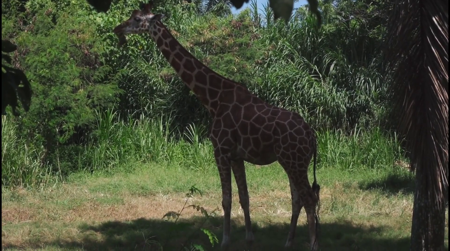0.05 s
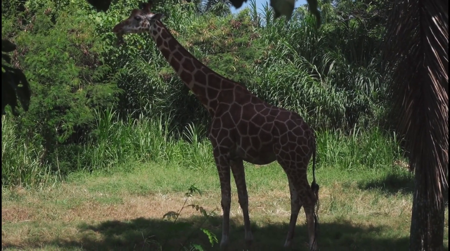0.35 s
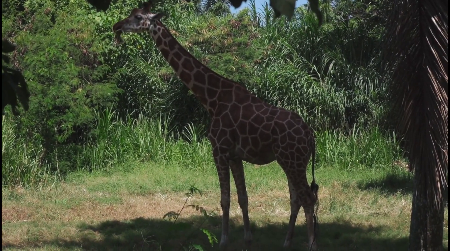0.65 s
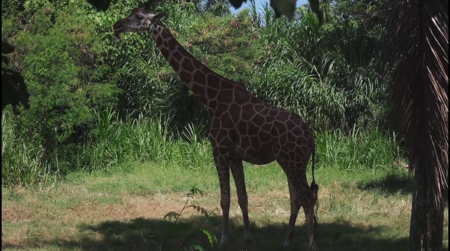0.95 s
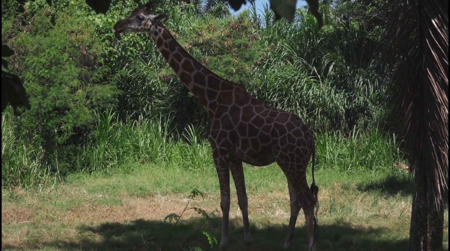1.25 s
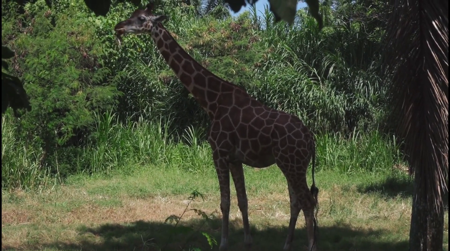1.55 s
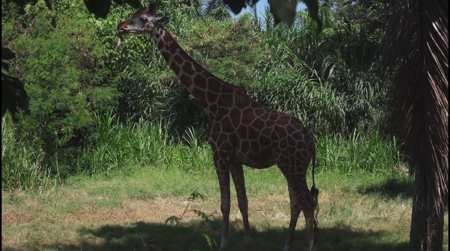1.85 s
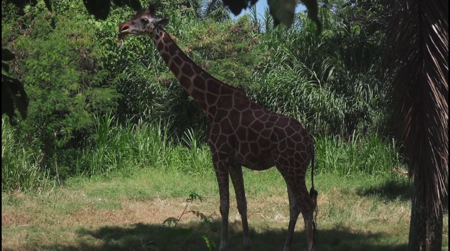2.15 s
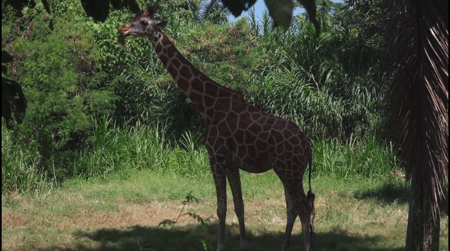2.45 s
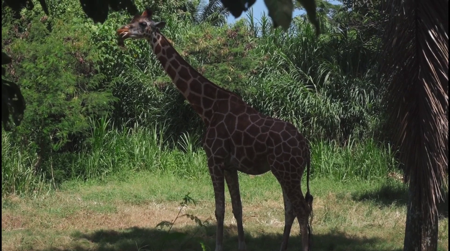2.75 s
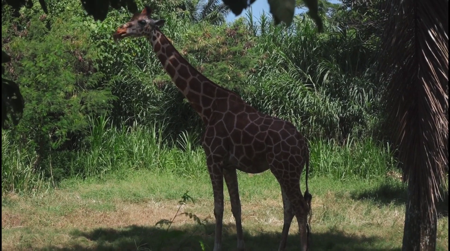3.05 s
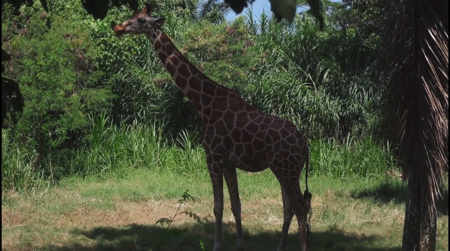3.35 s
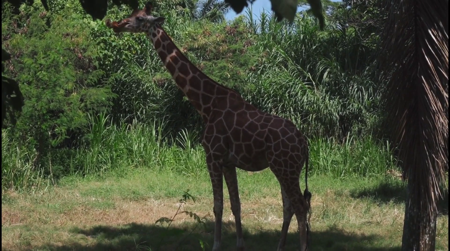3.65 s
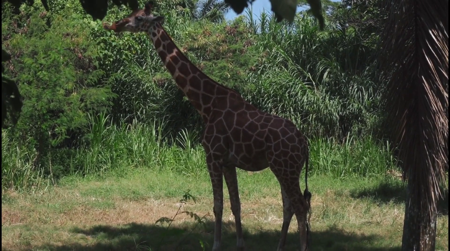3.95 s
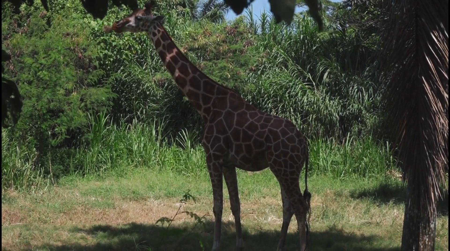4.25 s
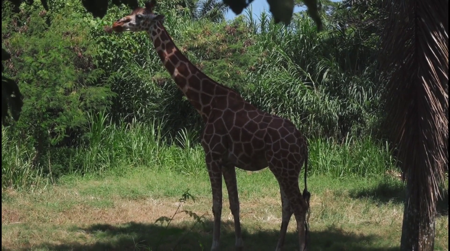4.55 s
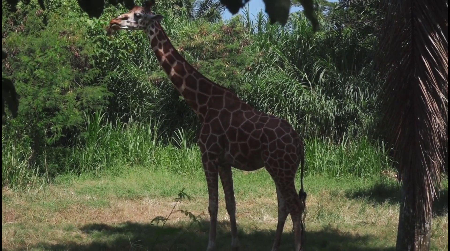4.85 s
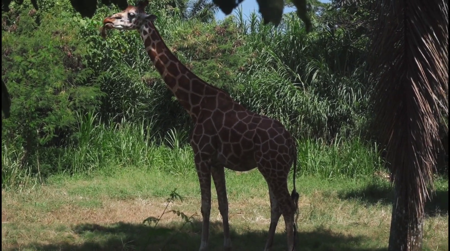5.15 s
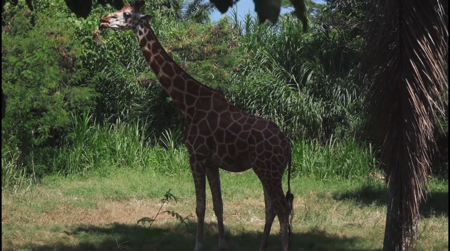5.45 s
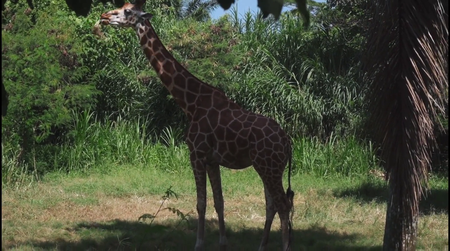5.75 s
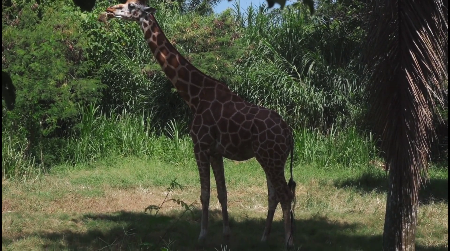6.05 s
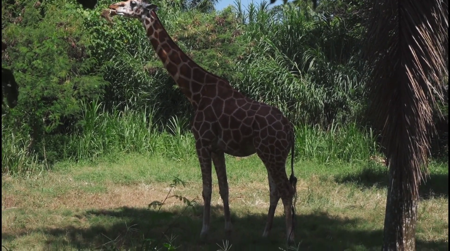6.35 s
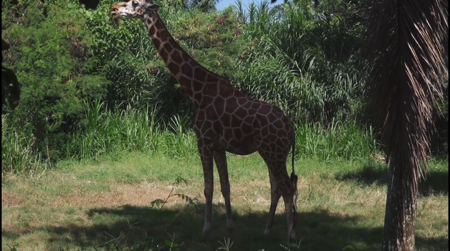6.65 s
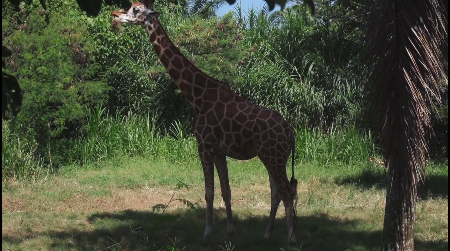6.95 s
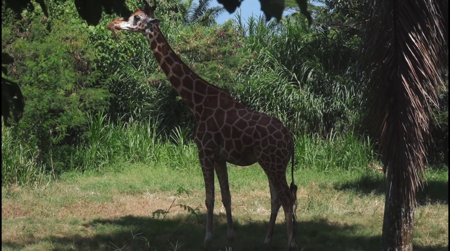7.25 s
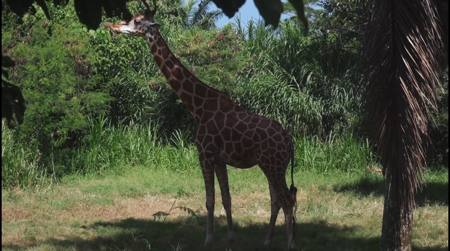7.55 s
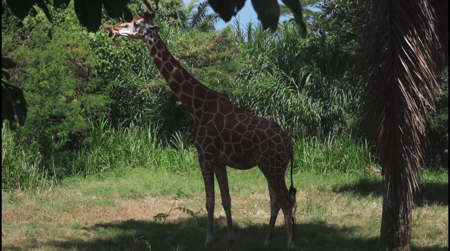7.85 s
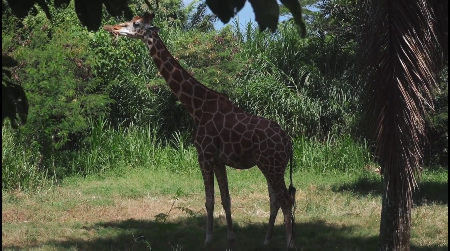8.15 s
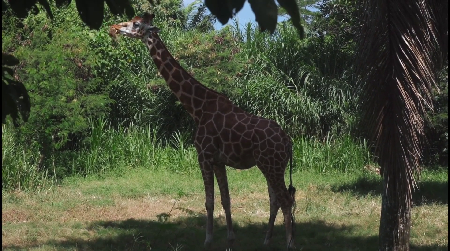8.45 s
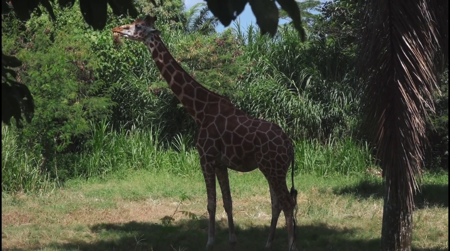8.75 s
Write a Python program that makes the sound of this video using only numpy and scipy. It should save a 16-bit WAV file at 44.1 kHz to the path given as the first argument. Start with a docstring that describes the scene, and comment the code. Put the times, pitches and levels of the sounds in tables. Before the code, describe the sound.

A giraffe feeds on a tree outdoors, tugging at a branch so that the leaves rustle, crinkle and rip in short, irregular bursts. Twigs tick and snap, loudest in one early cluster and again after the middle. Its mouth adds dull pops and soft lip scuffs. The feeding sounds fairly close, over a thin hiss, a faint hum and a low rumble that swells briefly near the end.

```python
"""Leaves rustle and rip as a large animal feeds in a tree, pulling at a branch and stripping it.
With each pull the leaves rub and crinkle and the bending branch ticks. Stalks and twigs snap,
and once the branch springs back with a hollow knock. The mouth adds dull pops and scuffs.
Under it all lie a low outdoor rumble, a faint hum and a thin hiss."""
import sys
import numpy as np
from scipy import signal
from scipy.io import wavfile

SR = 44100
rng = np.random.default_rng(int(sys.argv[2]) if len(sys.argv) > 2 else 0)


def pcm_store(signal):
    """Save signal as 16-bit PCM."""
    levels = np.round(np.clip(np.atleast_2d(signal), -1, 1) * 32767)
    wavfile.write(sys.argv[1], SR, levels.astype(np.int16).T)


N = 392049
TIME = np.arange(N) / SR


def gain_of(db):
    """Turns decibels into a number to multiply a sound by."""
    return 10 ** (np.asarray(db) / 20)


def evened(x):
    """Scales a sound to an average strength (rms) of 1."""
    return x / np.sqrt(np.mean(x ** 2) + 1e-20)


def level_at(tone, hz):
    """Looks up the level in dB that a tone table gives at hz."""
    f, db = np.transpose(tone)
    return np.interp(np.log(hz + 1), np.log(f + 1), db)


def add(mix, start_s, sound):
    """Lays a sound into the mix at start_s."""
    part = mix[max(round(start_s * SR), 0):][:len(sound)]
    part += sound[:len(part)]


def colour(x, shape_db, size=2048):
    """Turns each frequency up or down by shape_db(hz), keeping sudden starts sharp."""
    log_gain = np.log(gain_of(shape_db(abs(np.fft.fftfreq(size, 1 / SR)))))
    response = np.exp(np.conj(signal.hilbert(log_gain)))  # rings after a hit, never before
    return signal.fftconvolve(x, np.fft.ifft(response).real)[:len(x)]


def bump(hz, centre_hz, octaves):
    """A hump of height 1 around the pitch at which something rings."""
    return 1 / (1 + (np.log2((hz + 1) / centre_hz) / octaves) ** 2)


def split(x, hz=5210, order=4):
    """The parts of a sound below and above hz: its body and its treble."""
    filters = [signal.butter(order, hz, side, fs=SR, output="sos") for side in ("low", "high")]
    return [signal.sosfilt(sos, x) for sos in filters]


def wander(rate_hz):
    """A smooth random drift, changing up to about rate_hz times a second."""
    smoothing = signal.butter(2, rate_hz, fs=SR, output="sos")
    return evened(signal.sosfilt(smoothing, rng.standard_normal(N)))


def crinkle(per_s, spread_db, size=N):
    """Tiny clicks at random moments: many small, a few large."""
    strength = gain_of(spread_db * np.minimum(rng.exponential(1, size), 3.5))
    return evened(strength * rng.choice([-1, 1], size) * (rng.random(size) < per_s / SR))


# Tone of the outdoor air: f/Hz, relative level/dB
AIR_TONE = [(20, -18), (45, -4.5), (80, -6), (122, -7), (150, -15), (240, -18), (330, -22.5), (450, -26),
            (1000, -32), (3300, -34), (7000, -33.5), (11400, -35), (15200, -42.5), (16200, -67)]
# How far the low rumble is turned up or down: t/s, level/dB
RUMBLE_SWELL = [(0, -1), (8.31, -9), (8.37, 21), (8.46, 15), (8.58, 7)]


def outdoors(air_db=-60.5, rumble_hz=130, hum_hz=119, hum_db=-68):
    """A thin hiss, a faint wavering hum and a distant rumble that swells near the end."""
    air = evened(colour(rng.standard_normal(N), lambda hz: level_at(AIR_TONE, hz), size=4096))
    rumble, _ = split(air, rumble_hz)
    swell_db = np.interp(TIME, *np.transpose(RUMBLE_SWELL))
    air += rumble * (gain_of(swell_db) - 1)
    hum = np.sqrt(2) * np.sin(2 * np.pi * hum_hz * TIME + 0.55 * wander(rate_hz=2))
    return gain_of(air_db) * air + gain_of(hum_db) * hum


# Lips scuffing along the branch: t/s, length/s, relative level/dB, f/Hz, ring boost/dB
LIP_SCUFFS = [(0.295, 0.055, -66, 850, 6), (1.396, 0.024, -52.5, 810, -7), (1.454, 0.088, -63, 613, 19),
              (2.024, 0.033, -54, 554, 9), (2.296, 0.072, -57, 650, 2), (3.452, 0.022, -59, 820, 5),
              (5.123, 0.025, -56, 1044, 7), (5.424, 0.031, -61.5, 700, -1), (5.942, 0.065, -57.5, 800, 3),
              (6.168, 0.03, -51.5, 680, 2), (6.188, 0.042, -64, 700, 17), (6.319, 0.086, -59.5, 674, -2),
              (6.564, 0.025, -43, 606, -12.5), (6.866, 0.063, -59, 594, 13), (6.909, 0.0083, -47, 1170, 10),
              (7.88, 0.025, -49, 1253, 20)]


def lip_scuffs(level_db=4.5, fall_db_per_octave=11, size=8192):
    """Quick slips of the lips ring in the hollow of the mouth, which muffles all above its pitch."""
    out, t = np.zeros(N), TIME[:size]
    for start_s, length_s, db, mouth_hz, ring_db in LIP_SCUFFS:
        def hollow(hz):
            octaves_above = np.log2(np.maximum(hz / mouth_hz, 1))
            return ring_db * bump(hz, mouth_hz, octaves=0.13) - fall_db_per_octave * octaves_above
        slips = colour(crinkle(per_s=1500, spread_db=3, size=size), hollow)
        stroke = np.interp(t / length_s, [0, .15, .7, 1.3], [0, 1, .8, 0])  # rise, hold, fade
        add(out, start_s, gain_of(db + level_db) * evened(slips) * stroke)
    return out


# Dull pops of the mouth on the shoots: t/s, relative level/dB, length of the push/s
MOUTH_POPS = [(0.2667, -44.5, 0.00045), (0.3488, -36.5, 0.00047), (0.4401, -43, 0.00024),
              (0.751, -41, 0.0004), (1.0024, -34, 0.00037), (2.0275, -44.5, 0.00037),
              (2.3956, -28, 0.00008), (2.9851, -39, 0.00018), (3.3616, -48.5, 0.00048),
              (3.7513, -42.5, 0.00019), (3.7855, -43, 0.00052), (4.283, -40.5, 0.0004),
              (4.4072, -42.5, 0.00018), (4.4356, -42.5, 0.00018), (4.5044, -38.5, 0.00035),
              (5.088, -35.5, 0.00039), (5.3087, -39.5, 0.00031), (5.4618, -33, 0.00036),
              (5.6202, -42.5, 0.00067), (5.6489, -43, 0.00027), (5.6747, -36.5, 0.00021),
              (5.876, -43, 0.00041), (6.012, -38, 0.00036), (6.599, -37.5, 0.00042),
              (7.633, -36.5, 0.00014), (8.6754, -42, 0.00044)]
# Tone of the mouth: f/Hz, relative level/dB
MOUTH_TONE = [(60, 1), (200, 2), (700, 2), (1500, 4), (2200, 5.5), (5000, 0.5), (12000, -48)]


def mouth_pops(level_db=7, rebound_s=0.0052, size=1024):
    """Each pop is one brief push of air, followed by a small ragged rebound."""
    out, t = np.zeros(N), TIME[:size]
    for start_s, db, length_s in MOUTH_POPS:
        push = np.clip((length_s - t) * SR, 0, 1)
        rebound = 0.33 * rng.standard_normal(size) * np.exp(-t / rebound_s)
        add(out, start_s, gain_of(db + level_db) * (push + rebound))
    return colour(out, lambda hz: level_at(MOUTH_TONE, hz))


# Notes the branch rings with: f/Hz, peak level/dB, time to fade by 60 dB/s
BRANCH_NOTES = [(595, -31, 0.011), (746, -26, 0.026)]


def branch_knock(start_s=5.6488):
    """As its thickest shoot breaks, the branch springs back with a short, hollow, woody note."""
    out, t = np.zeros(N), TIME[:SR // 10]
    for hz, db, fade_s in BRANCH_NOTES:
        add(out, start_s, gain_of(db - 60 * t / fade_s) * np.sin(2 * np.pi * hz * t))
    return out


# Tone of cracking wood, for both ticks and snaps: f/Hz, relative level/dB
TWIG_TONE = [(100, -26), (600, -6), (1200, -8), (1900, 2.5), (2500, -3), (3200, -0.5), (5500, -7),
             (7500, -6), (10000, -12.5), (12500, -21), (15200, -27.5), (16200, -48)]


def branch_ticks(pull_db, bright_db, level_db=-6.5, ring_db=17):
    """Small dry ticks run through the bending branch; they are turned down in brighter pulls."""
    out = np.zeros(N)
    for tick_hz in np.geomspace(2100, 8500, num=8):
        wood = lambda hz: 0.6 * level_at(TWIG_TONE, hz) + ring_db * bump(hz, tick_hz, octaves=0.64)
        out += colour(crinkle(per_s=4, spread_db=1.5), wood)
    return evened(out) * gain_of(level_db + pull_db - 0.9 * np.maximum(bright_db, 0))


# Stalks and twigs breaking: t/s, level/dB, ringing f/Hz, treble compared with body/dB
TWIG_SNAPS = [(0.027, -38, 2500, -27), (0.1501, -39, 4360, -10.5), (0.1716, -44.5, 4350, -9),
              (0.203, -41.5, 2970, -13), (0.2664, -41, 1900, -1), (0.367, -37.5, 4360, 8),
              (0.4402, -40, 3840, 6), (0.7017, -45, 5040, 1), (0.7494, -39.5, 1820, -23),
              (0.8494, -45.5, 2110, -4), (0.897, -42.5, 3790, -14), (0.919, -49, 5470, 7),
              (1.0644, -43.5, 5000, 3), (1.0933, -40.5, 3740, -13), (1.2017, -37, 5570, -6),
              (1.233, -34, 5070, -18), (1.2412, -37.5, 5000, -10), (1.4041, -36, 2740, -12),
              (1.4186, -32.5, 2880, -1), (1.459, -24, 3300, -9), (1.4625, -30, 4200, 0),
              (1.4648, -21, 4860, -10), (1.4725, -22.5, 4150, -8), (1.4895, -33, 3530, 5),
              (1.4939, -12, 3300, -6.5), (1.4976, -27, 3640, 9), (1.5053, -21, 3290, -3),
              (1.5097, -23, 3670, -2), (1.5177, -24, 4400, -20.5), (1.5385, -31, 3320, 7),
              (1.5501, -34, 4730, 5), (1.5547, -31, 6290, 10), (1.558, -23, 2620, -5.5),
              (1.5746, -45, 2080, 1), (1.727, -28, 3320, -5.5), (1.7317, -35, 6660, -6),
              (1.7878, -41.5, 4670, -24), (1.9874, -37, 3460, -6), (2.0393, -18.5, 6230, 6.5),
              (2.1094, -36.5, 3860, 6), (2.322, -32, 5800, -5), (2.3955, -33.5, 3980, 4),
              (2.4064, -35, 3140, 3), (2.413, -34, 6070, 3), (2.418, -41, 3140, -2),
              (2.4253, -29.5, 3150, 1), (2.4491, -34, 3400, -8), (2.4676, -36, 3500, -22),
              (2.7422, -36.5, 6840, -1.5), (2.7829, -34, 4000, -1), (2.7916, -32, 4350, -14),
              (2.859, -43.5, 1870, 1), (2.9838, -39.5, 4570, 2), (3.0689, -38, 1980, -13),
              (3.2315, -41.5, 2200, -4), (3.287, -37, 2300, -10), (3.36, -40.5, 4200, -7),
              (3.462, -41.5, 2030, -11), (3.492, -41.5, 4130, -5), (3.5446, -35, 3550, 15),
              (3.5738, -27, 2050, -5), (3.653, -35, 6890, 15), (3.7218, -34.5, 8300, -1),
              (3.777, -30.5, 6600, -5), (4.07, -46.5, 4610, 6), (4.3, -37, 4450, -3),
              (4.342, -41.5, 2200, -20), (4.395, -45, 4300, -4), (4.461, -30, 4240, -2),
              (4.5615, -33, 3900, 0), (5.104, -43.5, 1930, -18), (5.183, -33.5, 5200, -13),
              (5.195, -35.5, 4940, 4), (5.3095, -38, 4730, 4), (5.4037, -30.5, 4560, -2),
              (5.4485, -37, 8900, 11), (5.5032, -30, 3900, 4), (5.517, -28.5, 6050, 17),
              (5.597, -32, 4540, 2), (5.6321, -23.5, 6600, -1), (5.649, -20, 3800, 2),
              (5.654, -26, 3440, 11), (5.733, -19.5, 2360, -7), (5.7564, -33.5, 3920, -9),
              (5.7857, -25.5, 4300, 2), (5.8086, -32, 3900, -8), (5.9204, -33, 3400, -7),
              (5.9348, -37, 6600, 2), (6.026, -40.5, 3490, 6), (6.2742, -39, 5430, 24),
              (6.479, -36.5, 5000, 16), (6.538, -16, 9900, 13.5), (6.6077, -23.5, 9100, 17),
              (6.6235, -37.5, 2680, -25), (6.696, -44, 2000, -8), (6.715, -18.5, 2900, 2.5),
              (6.86, -35, 2150, -1), (6.882, -36, 7130, 12), (6.9628, -38.5, 6010, 5.5),
              (7.609, -45.5, 6030, -1), (7.635, -35, 6100, -6.5), (7.714, -38, 5700, 0),
              (7.7887, -36, 2010, -15), (7.863, -33.5, 3500, -3), (7.881, -25, 3100, -10),
              (7.8855, -24, 3280, 17), (7.8968, -25, 3180, -3), (8.4395, -47.5, 4530, -9),
              (8.645, -37, 6060, 1), (8.7648, -42.5, 4450, -5), (8.808, -41.5, 5200, 4)]


def twig_snaps(strain_s=0.0007, fibres_s=0.0007, shiver_s=0.005, size=2048):
    """A stalk strains and gives way in one crack, its last fibres follow, and nearby leaves shiver."""
    out = np.zeros(N)
    lead = round(0.004 * SR)  # samples before the crack
    t = (np.arange(size) - lead) / SR
    strain = 0.03 * np.exp(-abs(t) / strain_s)
    fibres = 0.24 * np.exp(-abs(t) / fibres_s)
    shiver = 0.03 * np.exp(-abs(t) / shiver_s)
    splinters = np.where(t < 0, strain, fibres + shiver)
    for start_s, db, ring_hz, treble_db in TWIG_SNAPS:
        crack = rng.standard_normal(size) * splinters
        crack[lead] = 1  # the break itself
        ring_db = 14 + 0.16 * db  # the harder the break, the more the stub rings

        def stalk(hz):
            # a thin stalk gives off little sound below its own pitch
            loss_db = 4 * np.clip(np.log2(ring_hz / (hz + 1)), 0, 2)
            return level_at(TWIG_TONE, hz) + ring_db * bump(hz, ring_hz, octaves=0.3) - loss_db
        body, treble = split(colour(crack, stalk))
        snap = evened(body) + gain_of(treble_db) * evened(treble)
        snap /= np.std(snap[lead:2 * lead])  # the 4 ms after the break set the level
        add(out, start_s - lead / SR, gain_of(db) * snap)
    return out


# Pulls at the leaves, each with its own loudness and brightness; firm ones tend to be brighter:
# t/s, length/s, relative level/dB, brightness/dB
LEAF_PULLS = [(0.0, 0.022, -46, 0.5), (0.116, 0.11, -59.5, 0), (0.311, 0.025, -42, 3),
              (0.514, 0.053, -51, 1), (0.602, 0.024, -51.5, 0), (0.694, 0.067, -51, 1.5),
              (0.832, 0.091, -48.5, 0.5), (0.949, 0.056, -50, 3.5), (1.058, 0.023, -50.5, 0.5),
              (1.19, 0.069, -51.5, 2), (1.324, 0.11, -54, 0), (1.445, 0.024, -31, 1.5),
              (1.503, 0.024, -37, 3.5), (1.64, 0.11, -56.5, -3.5), (1.979, 0.13, -46.5, 1.5),
              (2.238, 0.01, -51, 3.5), (2.314, 0.017, -41, 1), (2.432, 0.047, -51.5, -1.5),
              (2.606, 0.12, -55, -0.5), (2.787, 0.094, -53.5, 1), (3, 0.15, -58.5, 1.5),
              (3.074, 0.008, -49.5, -3.5), (3.145, 0.24, -52, 2), (3.461, 0.011, -48, 1),
              (3.551, 0.027, -37.5, 1), (3.637, 0.18, -47.5, 3), (3.823, 0.064, -56.5, 0.5),
              (4.013, 0.2, -54.5, -0.5), (4.257, 0.32, -49, 1.9), (4.684, 0.07, -57, 0),
              (4.958, 0.057, -62.5, 1), (5.102, 0.08, -44.5, 2), (5.275, 0.32, -48, 3.5),
              (5.602, 0.07, -41, 2), (5.726, 0.062, -42.5, 1), (5.857, 0.024, -51, 2.5),
              (5.967, 0.028, -44.5, 3), (6.12, 0.31, -51, 3.5), (6.338, 0.043, -52, 1),
              (6.457, 0.25, -48.5, 0), (6.52, 0.016, -40, 4.5), (6.577, 0.063, -49.5, 6),
              (6.886, 0.005, -41, 0), (7.065, 0.14, -57.5, 0.5), (7.637, 0.009, -53, 2.5),
              (7.714, 0.073, -47, 2), (7.86, 0.041, -44, 4), (7.965, 0.032, -57, 3.5),
              (8.08, 0.12, -61.5, -0.5), (8.303, 0.11, -65, 0), (8.485, 0.033, -51, -0.5),
              (8.58, 0.17, -50.5, 4)]


def pulling(build_db_per_s=392, release_db_per_s=259, tremble_db=-15, settle_db_per_s=43.5):
    """Level and brightness of the leaves in dB: each pull builds, holds, lets go and trembles out."""
    t = TIME[::64]
    start_s, length_s, db, bright_db = np.transpose(LEAF_PULLS)[:, :, None]
    before_s = np.maximum(start_s - t, 0)
    after_s = np.maximum(t - start_s - length_s, 0)
    build = gain_of(db - build_db_per_s * before_s)
    release = gain_of(-release_db_per_s * after_s)
    tremble = gain_of(tremble_db - settle_db_per_s * after_s)
    power = build ** 2 * (release ** 2 + tremble ** 2)  # one row for each pull
    total = power.sum(0) + 1e-20
    brightness = (power * bright_db).sum(0) / total  # louder pulls count for more
    return np.interp(TIME, t, 10 * np.log10(total)), np.interp(TIME, t, brightness)


# Tone of rustling leaves: f/Hz, relative level/dB
LEAF_TONE = [(100, -27), (300, -7.5), (700, -5.5), (1100, -6.5), (1450, -3.5), (1950, 0), (2450, -2.5),
             (3200, -0.5), (5000, -4), (7200, -4.5), (10000, -8.5), (12500, -12.5), (15200, -21.5),
             (16200, -49.5)]


def leaf_rustle(pull_db, bright_db, level_db=-1, ring_db=15, firm_db=-54, rip_db=-37, rip_hz=4100):
    """A soft pull only slides leaf on leaf; a firm one makes them crinkle, each with a short ring."""
    crinkles = np.zeros(N)
    for leaf_hz in np.geomspace(1800, 11000, num=16):
        touch = gain_of(1.5 * wander(rate_hz=12))  # the leaves take turns, so the tone shifts
        clicks = touch * crinkle(per_s=40, spread_db=3)
        crinkles += colour(clicks, lambda hz: ring_db * bump(hz, leaf_hz, octaves=0.066))
    crinkles = evened(crinkles)
    firmness = 1 / (1 + gain_of(firm_db - pull_db))
    friction = np.sqrt(firmness) * crinkles + np.sqrt(1 - firmness) * rng.standard_normal(N)
    friction *= gain_of(2.5 * wander(rate_hz=40))  # leaves catch and slip, so the sound comes in clumps
    body, treble = split(evened(colour(friction, lambda hz: level_at(LEAF_TONE, hz))))
    lows, mids = split(body, hz=3000, order=1)
    body = mids + lows * gain_of(-0.49 * bright_db)  # brighter pulls have less low sound
    rubbing = body * gain_of(-1.255 * bright_db) + treble * gain_of(bright_db)
    # under the hardest pulls the taut leaves rip, and the sound gathers round one pitch
    rip_tone = lambda hz: level_at(LEAF_TONE, hz) + 20 * bump(hz, rip_hz, octaves=0.745)
    ripping = evened(colour(crinkles + rng.standard_normal(N), rip_tone))
    torn = 1 / (1.5 + np.exp((rip_db - pull_db) / 2))
    return (np.sqrt(1 - torn) * rubbing + np.sqrt(torn) * ripping) * gain_of(pull_db + level_db)


def scene():
    """Adds the tree, the mouth and the outdoor air together in one channel."""
    pull_db, bright_db = pulling()
    leaves = leaf_rustle(pull_db, bright_db)
    wood = branch_ticks(pull_db, bright_db) + twig_snaps() + branch_knock()
    mouth = mouth_pops() + lip_scuffs()
    return (leaves + wood + mouth + outdoors())[None]


def record(dry):
    """Cuts away the highest treble, above 16200 Hz."""
    treble_cut = signal.firwin(511, 16200, window=("kaiser", 9), fs=SR)
    return signal.oaconvolve(dry, treble_cut[None], "same")


dry = scene()
out = record(dry)
pcm_store(out)
```